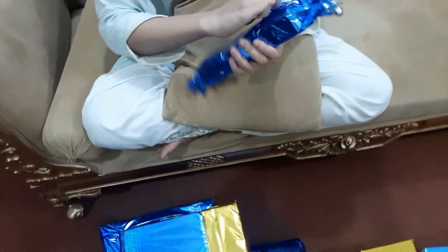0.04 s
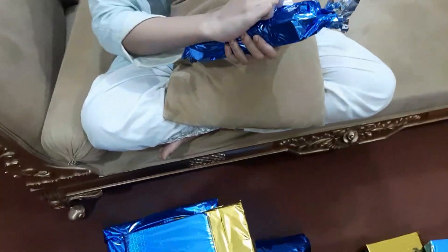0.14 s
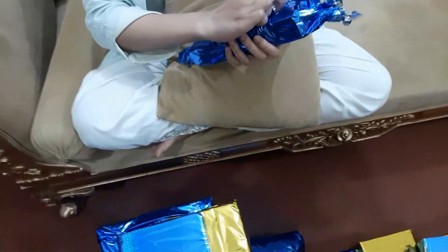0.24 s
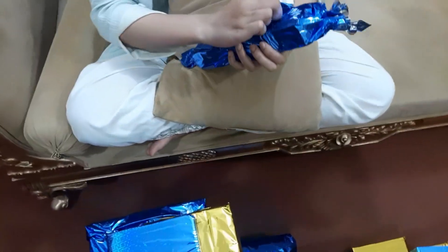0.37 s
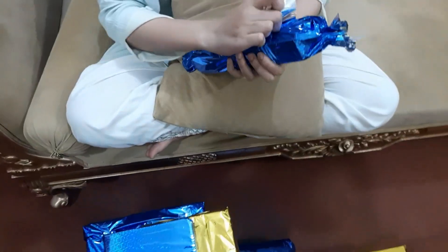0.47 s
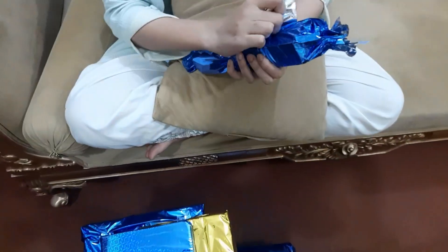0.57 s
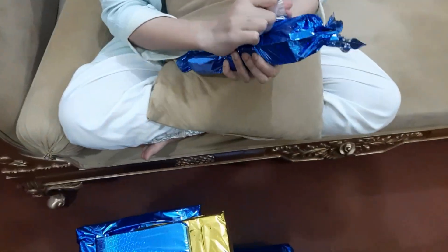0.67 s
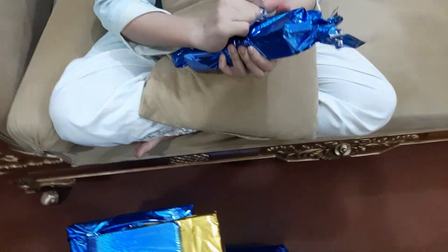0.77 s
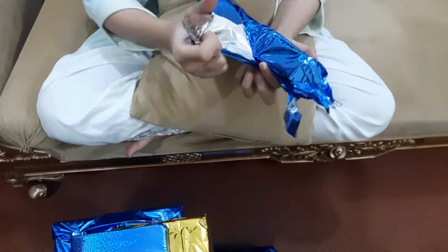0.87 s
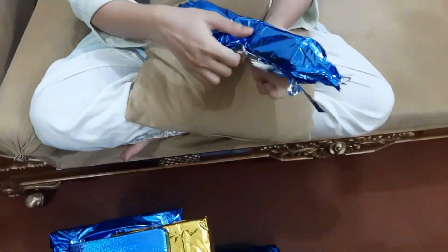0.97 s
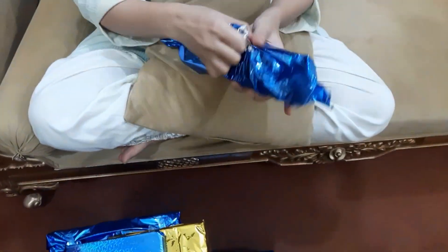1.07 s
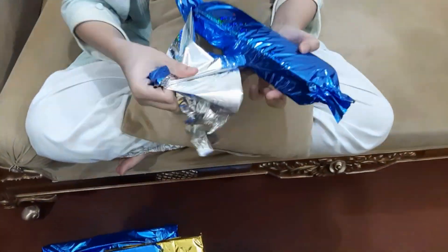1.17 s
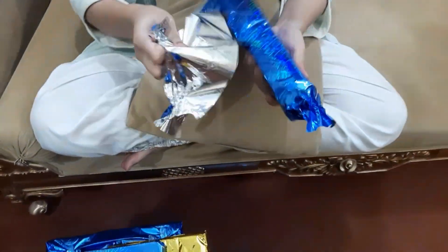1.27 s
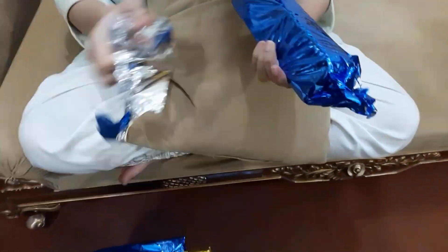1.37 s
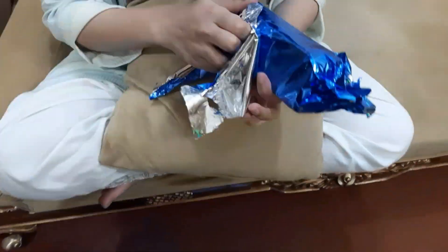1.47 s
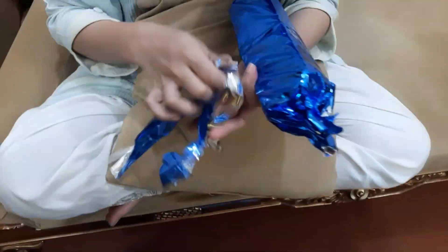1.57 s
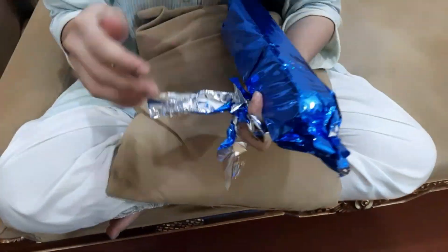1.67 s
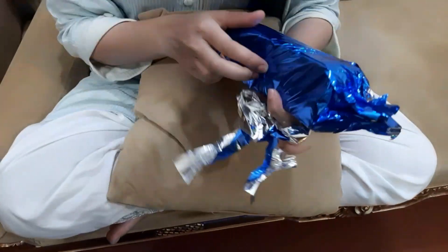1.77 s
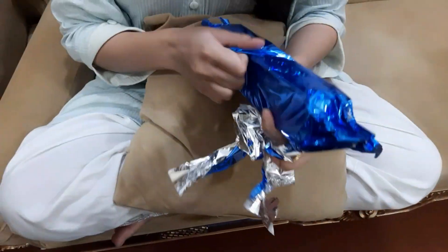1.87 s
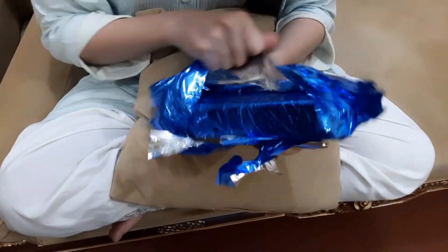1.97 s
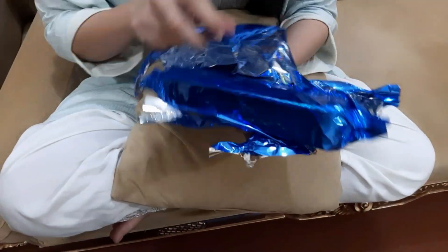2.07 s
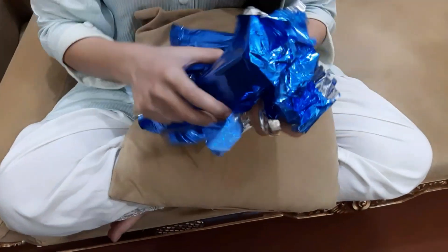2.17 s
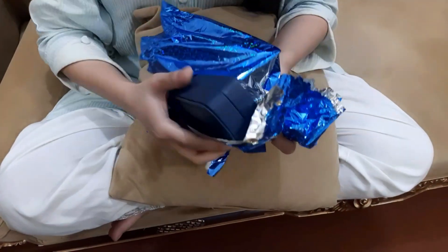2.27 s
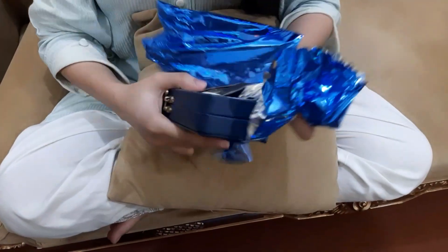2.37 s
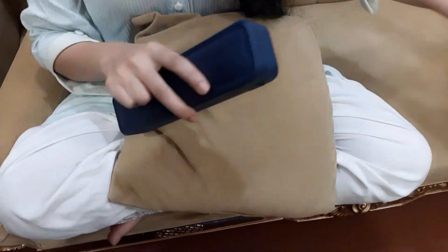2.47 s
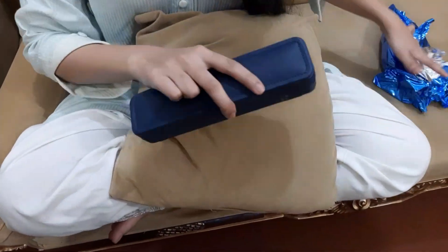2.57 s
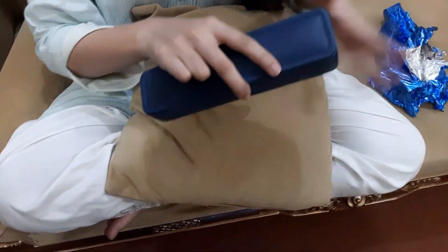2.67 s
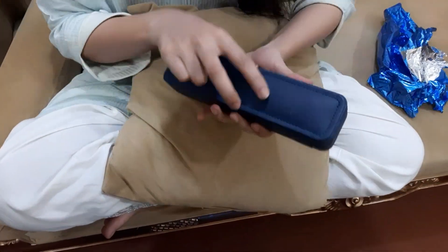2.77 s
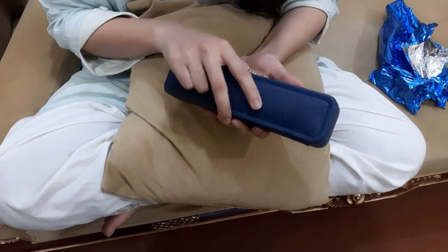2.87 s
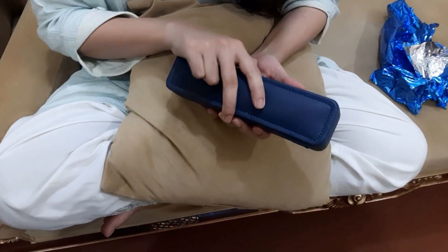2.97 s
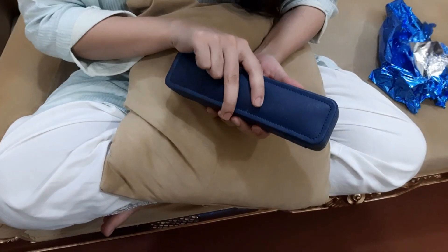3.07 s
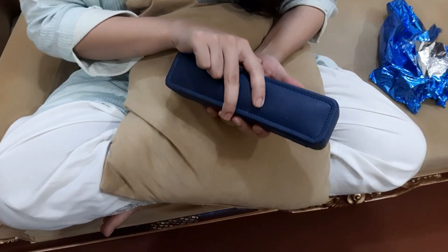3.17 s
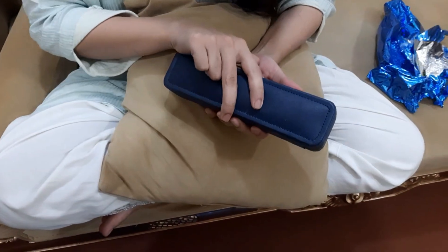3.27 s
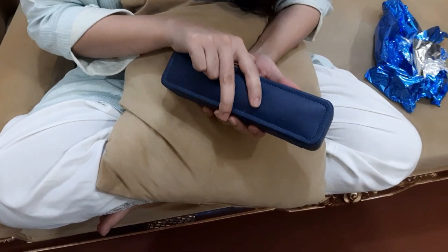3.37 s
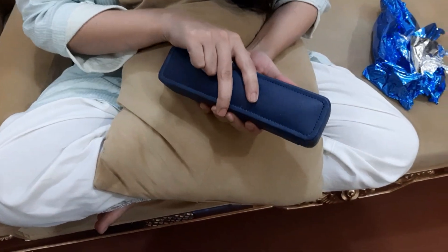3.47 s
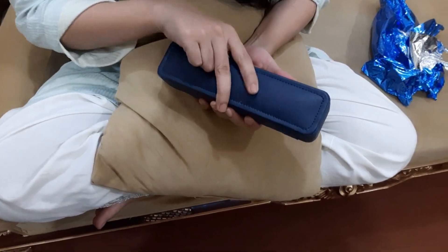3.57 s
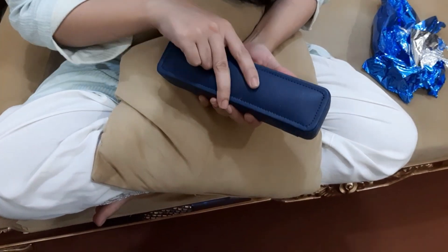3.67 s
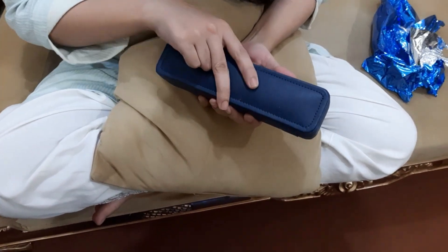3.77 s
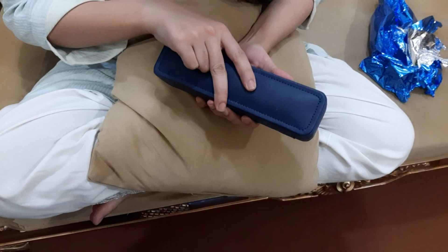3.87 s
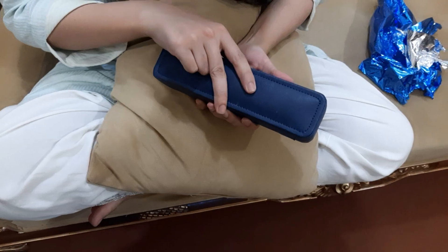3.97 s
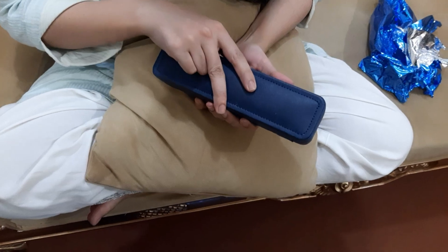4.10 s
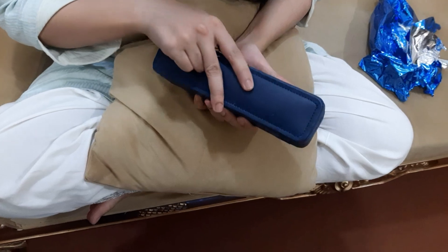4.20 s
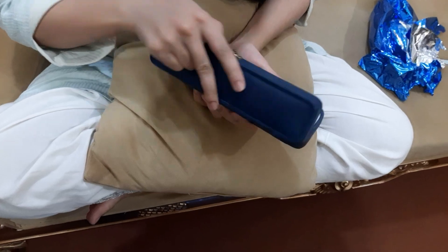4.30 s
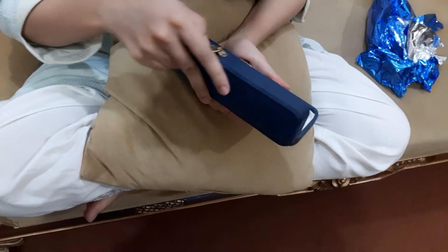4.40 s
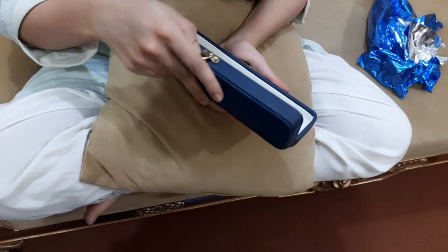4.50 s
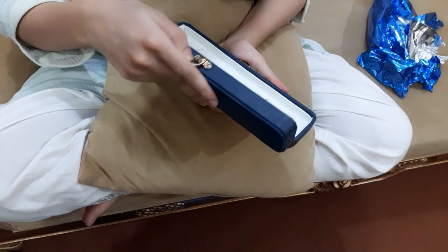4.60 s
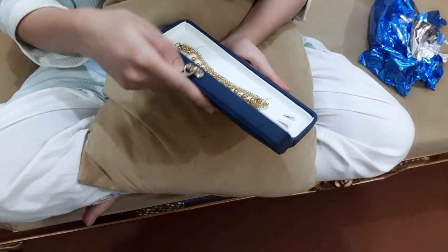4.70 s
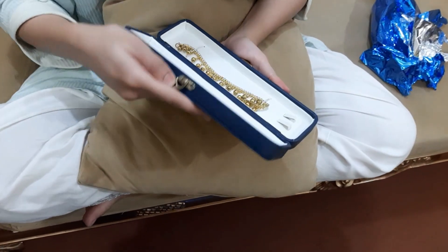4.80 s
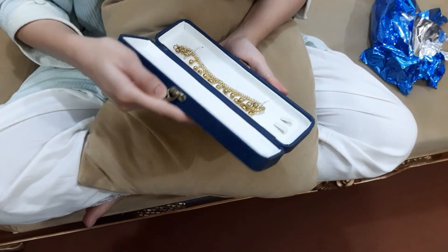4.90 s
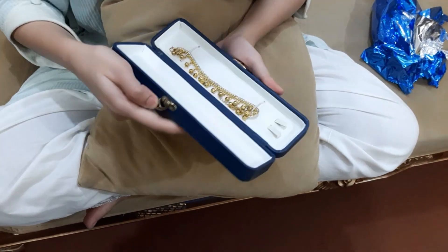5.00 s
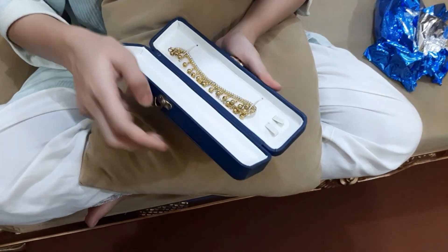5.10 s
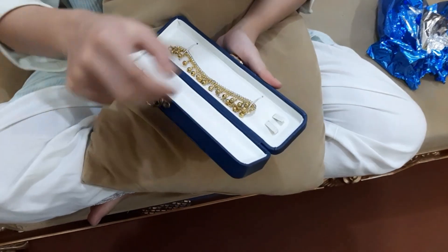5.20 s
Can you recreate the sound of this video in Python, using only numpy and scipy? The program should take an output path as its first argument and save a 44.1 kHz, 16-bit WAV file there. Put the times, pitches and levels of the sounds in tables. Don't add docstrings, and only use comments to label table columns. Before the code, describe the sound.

Thin metallic foil crackles, snaps and tears loudly off a small box, then soft rubs, light taps and a latch click in a quiet room.

```python
import sys
import numpy as np
from scipy import signal
from scipy.fft import rfft, irfft
from scipy.io import wavfile

SR = 44100
rng = np.random.default_rng(int(sys.argv[2]) if len(sys.argv) > 2 else 0)


def rack_gain(trim_db):
    fader = np.asarray(trim_db, float)
    return 10 ** (fader / 20)


def generate_wav(sig):
    pcm = np.round(np.clip(np.atleast_2d(sig).T, -1, 1) * 32767).astype(np.int16)
    wavfile.write(sys.argv[1], SR, pcm)


N = 231390
TIME = np.arange(N) / SR
BANDS_HZ = 130 * 2 ** np.arange(0, 7.1, .5)

# frequency in Hz, level in dB per Hz.
RUMBLE_COLOUR = [(12, -52), (20, -40), (32, -12.5), (113, -2), (151, -9), (185, -5.5), (330, -12.5),
                 (480, -23), (690, -25.5), (1500, -57.5), (3300, -120)]
# frequency in Hz, level in dB per Hz.
HISS_COLOUR = [(530, -26), (900, -5), (1020, -8), (1150, -4), (1230, -8), (1500, -10.5), (1690, -8.5),
               (1840, -10), (2810, -10), (3170, -11), (8960, -24.5), (10600, -20), (16200, -14)]
HOUSE_DB, HISS_DB = -68, -78.5
# peak in seconds, swell and fade in seconds per 10 dB, level in dB.
SOFA_SHIFTS = [(0.07, -1, 0.06, -55), (.24, -0.2, 0.12, -47.5), (.52, 1.8, 0.3, -56),
               (.87, 0.05, -0.05, -50.5), (1.28, 0.65, -0.2, -53), (1.58, 0.36, 0.2, -54),
               (1.85, 0, 0.3, -55), (2.1, 0.2, 0.26, -53), (2.55, 0.8, 0.17, -50.5), (3.57, 0.56, .1, -55),
               (3.95, 0.23, 0.5, -62.5), (4.24, 0.28, 0.23, -54.5), (5.25, 1.2, .3, -61)]

# frequency in Hz, time to fall by 60 dB in seconds.
ROOM_DECAY = [(100, 0.18), (1200, 0.3), (4000, 0.33), (12000, 0.27)]
ROOM_GAP_S, NEAR_ROOM_DB, LATCH_ROOM_DB = 0.01, -12.5, 6.5
# frequency in Hz, level in dB per Hz.
LATCH_COLOUR = [(60, -31), (110, -5), (280, -2.5), (650, -8.5), (1250, -10), (3000, -15.5), (5600, -18),
                (7600, -17.5), (8900, -34), (11000, -24), (16000, -34)]
# frequency in Hz, difference in dB.
PORT_BALANCE = [(60, 5.5), (110, 10.5), (200, 3), (380, 2), (700, 6.5), (1290, 1.5), (2380, 3), (4400, 0.5),
                (8120, -3), (15000, 0.5)]
PORT_LAG_S, LAG_SPREAD_S = .00022, .00009
SPLICES = [
    (0.784, .004),
    (3.0205, 0.005),
]

# time in seconds, level in dB, pitch in Hz, 60 dB fall in seconds.
CUSHION_BUMPS = [(.202, -30.5, 194, 0.17), (.215, -32, 228, 0.12), (0.239, -31.5, 208, 0.12),
                 (.872, -39, 312, 0.065), (1.283, -32, 258, .08), (1.805, -41.5, 453, 0.064),
                 (1.995, -35, 185, .08), (2.13, -38, 190, 0.064), (2.565, -35, 300, 0.061),
                 (.28, -41, 99.7, 0.31), (2.851, -42.5, 111.5, 0.084), (3.206, -42, 119, 0.1)]
# pitch in Hz, level in dB, 60 dB fall in seconds.
BOX_MODES = [(300, 1, 0.029), (690, -9.5, 0.02), (1150, -4, 0.015)]
# start and length in seconds, level in dB, growth over the stroke in dB, bright part in dB.
RUBS = [(2.738, 0.04, -58, -5.5, -18), (2.748, 0.019, -69.5, -4.5, 7), (2.84, 0.042, -51, -4.5, -15),
        (2.862, 0.02, -65, 2.5, 3), (3.045, 0.044, -70.5, -3.5, 10.5), (3.042, 0.3, -76, -4, 7),
        (3.112, 0.045, -60, -5, -18), (3.154, 0.062, -58.5, 10.5, -35), (3.212, 0.2, -46, -16, -30.5),
        (3.442, 0.04, -60, 3, -34), (3.481, .15, -57.5, -4, -24), (3.977, 0.18, -73.5, -6, 1),
        (5.04, .2, -69, -4, -7.5)]
# frequency in Hz, level in dB per Hz.
RUB_COLOUR = [(100, -15), (250, 3.5), (600, 1.5), (1300, -7.5), (1900, -12.5), (4000, -13), (6500, -10),
              (8600, -25), (11500, -25), (16000, -22)]
RUB_ATTACK_S, RUB_RELEASE_S = 0.0029, 0.0068
RUB_TOP_DB, RUB_PAN_DB, PAN_PER_BRIGHT = -11, -0.2, -0.087
PALM_S, PALM_DB = (2.6, 2.91), -29
# middle and half length in
# seconds, pitch in Hz, level in dB.
SLIDES = [
    (2.76, 0.023, 1090, -67),
    (2.872, 0.016, 1748, -60.5),
    (2.86, 0.022, 2430, -64),
    (3.126, 0.022, 1150, -69),
    (3.226, 0.022, 1330, -68),
    (3.289, 0.14, 695, -65),
    (3.835, 0.017, 1050, -72),
    (4.28, 0.072, 1040, -66),
    (4.625, 0.028, 4600, -77.5),
    (5.18, .04, 4400, -75),
]
# middle and half length in seconds, pitch in Hz, level in dB.
SQUEAKS = [
    (2.772, .026, 11000, -69),
    (4.05, .04, 2180, -80),
    (4.14, .025, 3480, -79),
    (4.66, .125, 1940, -75),
    (4.92, .09, 2290, -84),
]
# time in seconds, peak in dB, centre in Hz.
TAPS = [(2.738, -50, 900), (3.1105, -48, 1201), (3.4455, -51.5, 782), (3.4702, -40, 1000),
        (3.552, -55.5, 1143), (3.824, -59, 900), (5.047, -57.5, 1402), (5.229, -62, 1240)]
TAP_THUMP_DB, TAP_MS = -27, 2.9
# time in seconds, peak in dB, centre in Hz.
TICKS = [(2.707, -54, 7000), (3.0394, -50.5, 5300), (3.1285, -49, 5200), (3.2104, -51, 3100),
         (3.264, -53, 4150), (3.3122, -52.5, 6630), (3.553, -57, 4185), (3.652, -63, 6000),
         (3.978, -51, 4890), (4.1085, -50.5, 5080), (4.1826, -36.5, 5300), (4.196, -47, 2800),
         (4.203, -48, 2800), (4.3834, -58, 4060), (4.5946, -60, 4690), (4.605, -56, 4820),
         (5.0888, -50, 7000), (5.148, -51.5, 4900)]
TICK_DULL_DB, TICK_MS = -17, 2.4
# time in seconds, peak in dB, centre in Hz, dull part in dB, rattle in ms.
LATCH_SLIP = [
    (4.1788, -42, 3500, -18, 6.9),
]
# pitch in Hz, level in dB, 60 dB fall in seconds.
LATCH_MODES = [(1330, -39.5, 0.026), (4150, -44, 0.012), (2950, -35.5, 0.0082), (5300, -33, 0.011),
               (7250, -41.5, 0.011)]
LATCH_S = 4.183

# frequency in Hz, level in dB per Hz.
FOIL_COLOUR = [(71, -41.5), (120, -11), (217, -5.5), (326, 1.5), (532, -2), (834, -1), (1810, 0),
               (3930, 1.5), (5450, 1.5), (6550, 1), (7710, -5), (8720, -16.5), (11600, -7), (15800, -10.5)]
# start and length in seconds, level in dB, growth in dB, dull part of the slack sheet in dB.
PULLS = [(.024, 0.031, -33.5, 3.5, -17), (.32, 0.25, -39.5, 5.5, -12), (0.554, 0.088, -22, -5, -16.5),
         (.866, 0.057, -35.5, -8, -7), (.966, 0.073, -40, 2.5, -5.5), (1.104, .066, -33.5, 6, -3),
         (1.184, 0.046, -39, 0, -13.5), (1.281, 0.025, -19, 1, -11.5), (1.447, 0.078, -40.5, 0, -7),
         (1.54, 0.13, -42.5, 7.5, -9.5), (1.852, 0.15, -34.5, 9, -11), (2.059, 0.197, -31.5, 1, -10)]
PULL_ATTACK_S, PULL_RELEASE_S = 0.0016, .005
# start and length in seconds, level, growth and dull part in dB.
HELD = (0., 2.5, -53, 0, -21)
# peak in seconds, swell and fade in seconds per 10 dB, level in dB, dull part in dB.
SQUEEZES = [(0., .01, 0.37, -42.5, -13), (.05, -0.1, 0.05, -30.5, -12), (0.219, 0.02, 0.12, -40.5, -2),
            (.645, 0.24, -0.01, -31.5, -13), (0.722, 0.07, 0, -25, -12), (0.83, 0.16, 0.01, -31.5, -8),
            (1.042, -0.02, -0.19, -38, -6.5), (1.1, 0.5, -0.24, -39, -15), (1.276, 0, -0.04, -29.5, -6),
            (1.32, 0.5, -0.06, -33, -14), (1.432, 0.1, 0.16, -40.5, -40), (1.664, 0.07, 0, -30.5, -7.5),
            (1.806, 0, 0.45, -39.5, -34), (1.841, -0.02, 0.5, -38.5, -1.5),
            (2.005, 0.08, 0.11, -24.5, -9.5), (2.21, 0.02, 0.08, -30.5, -8), (2.29, -0.54, -0.88, -43.5, 9),
            (2.378, 0.05, 0.12, -27, -12.5), (2.576, 0, 0.01, -33, -6)]
AWAY_S, AWAY_DB_PER_S = 2.58, 262
# time in seconds, top part in dB.
TENSION = [(0, -16.5), (.25, -12.5), (.56, -12.5), (.64, -6.5), (.73, -13), (.84, -9.5), (1.3, -8.5),
           (1.5, -11), (1.79, -4), (2.05, -11), (2.6, -10)]
# time and half length in seconds, change in dB, centre in Hz.
RUSHES = [(0.009, 0.0018, -8.5, 4780), (0.016, 0.0045, 5, 4750), (0.244, 0.0055, 5.5, 5290),
          (0.28, 0.0056, 5, 4900), (0.311, 0.0111, -4.5, 3790), (0.346, 0.015, 4, 5170),
          (0.389, 0.0112, 6, 3760), (0.4645, 0.0035, 7.5, 5430), (0.49, 0.0068, -5.5, 3960),
          (0.497, 0.005, 4.5, 5210), (0.514, 0.0047, 3, 4080), (0.534, 0.0131, -5.5, 4220),
          (0.559, 0.0058, 5, 5570), (0.568, 0.004, -7, 4500), (0.694, 0.015, -4.5, 3590),
          (0.725, 0.0105, 7, 5040), (0.831, 0.0107, 9.5, 4686), (0.879, 0.0107, 4, 4310),
          (1.044, 0.0107, 5.6, 4190), (1.109, 0.0053, 5, 5330), (1.1722, 0.0018, -9, 4000),
          (1.1765, 0.0025, 11.5, 3970), (1.251, 0.015, -4.5, 4330), (1.293, 0.015, 10.5, 4080),
          (1.425, 0.015, -7, 5070), (1.434, 0.005, 8.2, 5830), (1.453, 0.007, 6.0, 4840),
          (1.507, 0.0084, 6, 4840), (1.532, 0.015, -6, 3850), (1.663, 0.015, 5, 4360),
          (1.777, 0.0047, 5, 5900), (1.784, 0.0068, -6.5, 5790), (1.8065, 0.003, 13.9, 6076),
          (1.838, 0.0073, -4, 3360), (1.992, 0.015, 3, 4873), (2.053, 0.0041, -5.5, 4860),
          (2.061, 0.0045, 3.5, 5580), (2.069, 0.0048, -5.5, 4830), (2.083, 0.0079, 5, 4840),
          (2.139, 0.0139, 3.5, 5270), (2.188, 0.0041, 4.0, 4990), (2.224, 0.0053, 5, 6070),
          (2.287, 0.0145, -4.5, 3810)]
RUSH_SHARE, LULL_SHARE, RUSH_TINT = 0.42, .9, 0.52
TOP_PER_RUSH = .35
# time and half length in seconds, pitch in Hz, lift in dB.
SINGING_FOLDS = [
    (0.057, .06, 3100, 6),
    (.62, 0.054, 2700, 5.5),
    (0.81, .04, 2000, 6),
    (.06, 0.071, 4000, -5),
]
# time in seconds, peak in dB, centre in Hz.
POPS = [(.0144, -11.5, 3480), (.3854, -21, 2880), (.473, -19.5, 4000), (.544, -20, 4340), (.72, -19, 1950),
        (.5129, -17, 4180), (.830, -11, 4400), (.8681, -20, 3610), (.9849, -24, 3170), (1.1059, -17, 2730),
        (1.1438, -14.5, 3400), (1.1739, -1, 4000), (1.2825, -8.5, 3860), (1.5045, -24.5, 3300),
        (1.5574, -27, 2950), (1.5964, -24.5, 3270), (1.6617, -17.5, 4550), (2.326, -23, 3220),
        (2.3456, -25.5, 3700), (2.3581, -22.5, 3800), (2.4247, -17, 4530), (2.525, -27, 3970)]
# time in seconds, peak in dB, centre in Hz.
CREASES = [(.194, -33, 5800), (.243, -25.5, 5870), (0.278, -27.5, 4920), (.3345, -23, 6090),
           (0.4482, -20.5, 5472), (.4622, -11.5, 5883), (.4958, -13.5, 5200), (.5235, -20, 5100),
           (0.5547, -14, 5393), (.702, -22, 4782), (0.7165, -14.5, 4718), (0.7245, -18, 5220),
           (.925, -24, 6560), (.967, -29, 5546), (1.044, -20, 6148), (1.2673, -20, 4900),
           (1.432, -19, 5820), (1.4519, -24, 5705), (1.642, -26, 6400), (1.763, -29, 5598),
           (1.7766, -21, 5980), (1.804, -10.5, 6400), (1.852, -17, 5560), (1.9899, -14, 5810),
           (2.06, -14.5, 5300), (2.081, -16, 5100), (2.1873, -16.5, 5270), (2.2235, -18, 6174),
           (2.174, -24.5, 5440), (2.2923, -27, 5800)]
# time in seconds, peak in dB, centre in Hz.
LONE_SNAPS = [(0.0291, -22, 6070), (0.1706, -37, 5550), (0.282, -29.5, 4730), (0.3234, -24, 5850),
              (0.3888, -24, 3300), (0.3934, -23, 5070), (0.4513, -25, 4320), (0.5594, -14, 5340),
              (0.574, -15, 4510), (0.5866, -15, 4770), (0.6712, -22, 4900), (0.7357, -18, 4730),
              (0.8019, -28, 3580), (0.8747, -24, 3580), (0.9012, -26, 4330), (1.1089, -16, 6200),
              (1.2279, -21, 4690), (1.2955, -6, 3920), (1.3542, -26, 4920), (1.3942, -31, 4820),
              (1.4152, -35, 4750), (1.4886, -27, 5950), (1.7463, -35.5, 5620), (1.9317, -16, 5610),
              (1.9525, -16, 5920), (2.139, -21.5, 5400), (2.2549, -23, 4760), (2.3965, -19, 3910),
              (2.4589, -21, 5160), (2.4745, -22, 4350), (2.5931, -33, 5640)]
POP_MS, CREASE_MS, SNAP_MS = 4.5, 3.0, 1.6
CRACK_BUILD_S = .001
CRACK_DULL_DB, DULL_PER_SLACK, DULL_PER_PEAK = -20, .6, -.6
# time in seconds, peak in dB, pitch in Hz.
DENTS = [(0.0519, -31.5, 1180), (0.2011, -36, 860), (0.2434, -31.5, 670), (0.3481, -32.5, 1200),
         (0.3839, -29, 1150), (0.512, -26, 1400), (0.557, -31, 1330), (0.6152, -30.5, 1160),
         (0.6311, -27, 700), (0.7133, -33, 920), (0.821, -30, 890), (0.8372, -36, 1070), (0.9667, -35, 830),
         (0.9849, -34, 1001), (1.0026, -36, 960), (1.0426, -29, 980), (1.1275, -28, 850),
         (1.1735, -25, 1110), (1.2665, -29, 810), (1.2818, -19, 990), (1.2935, -21, 1080),
         (1.3079, -28, 930), (1.3658, -37.5, 1080), (1.5939, -35.5, 870), (1.6616, -29.5, 1050),
         (1.8334, -35, 870), (2.0444, -28, 890), (2.0838, -33, 715), (2.1288, -27, 1160),
         (2.2938, -34, 900), (2.3688, -30.5, 750), (2.4149, -39, 820)]
# time in seconds, peak in dB.
GLINTS = [(.0153, -32), (.0412, -33), (.2438, -35), (.831, -24), (.925, -30), (1.0437, -29), (1.1064, -26),
          (1.175, -19), (1.2668, -28), (1.2823, -19), (1.29, -19), (1.326, -29), (1.7776, -30),
          (1.7926, -35), (1.8048, -21), (1.8533, -22), (1.9115, -25), (1.9645, -25), (2.1883, -26),
          (2.2238, -28), (2.2925, -36), (2.301, -32), (2.4259, -29), (2.459, -29)]


def table(rows, hz):
    f, db = np.transpose(rows)
    return np.interp(np.log(np.maximum(hz, 1)), np.log(f), db)


def colour(x, rows, scale=1):
    log_gain = scale * table(rows, np.fft.rfftfreq(4096, 1 / SR)) * np.log(10) / 20
    cepstrum = irfft(log_gain)
    cepstrum[1:2048] *= 2
    cepstrum[2049:] = 0
    response = irfft(np.exp(rfft(cepstrum)))
    return signal.fftconvolve(x, np.atleast_2d(response), axes=-1)[:, :N]


def band_pass(x, lo_hz, hi_hz, order):
    return signal.sosfilt(signal.butter(order, [lo_hz, hi_hz], "band", fs=SR, output="sos"), x)


def band_rms(x, lo_hz, hi_hz):
    return np.std(band_pass(x.mean(0), lo_hz, hi_hz, 4))


def share(lo_hz, hi_hz):
    return np.clip(np.log(BANDS_HZ / lo_hz) / np.log(hi_hz / lo_hz), 0, 1)


def swells(s, rows):
    peak, swell, fade, db = np.array(rows)[:, :4].T[:, :, None]
    before = (peak - s) / np.maximum(swell, 1e-3)
    after = (s - peak) / np.maximum(fade, 1e-3)
    return rack_gain(db - 10 * np.maximum(before, after)) ** 2


def strokes(s, rows, attack_s, release_s):
    start, length, db, growth_db = np.array(rows)[:, :4].T[:, :, None]
    outside = np.maximum((start - s) / attack_s, 0) + np.maximum((s - start - length) / release_s, 0)
    return rack_gain(db + growth_db * np.clip((s - start) / length, 0, 1) - 10 * outside) ** 2


def blend(power, part_db):
    total = power.sum(0) + 1e-20
    part = rack_gain(part_db) ** 2 @ power + 1e-22
    return 10 * np.log10(total), 10 * np.log10(part / total)


def swarm(rate, scatter_db, flurry, span):
    chance = rng.random((40000, 3))
    pace = np.repeat(np.exp(flurry * rng.standard_normal(2000)), 20)
    s = np.cumsum(-np.log(1 - chance[:, 0]) * pace / (rate * pace.mean()))
    db = scatter_db * np.minimum(-np.log(1 - chance[:, 1]), 4.2)
    db -= 10 * np.log10(np.mean(rack_gain(db) ** 2) * rate)
    lag_s = PORT_LAG_S + LAG_SPREAD_S * 6.7 * (chance[:, 2] - .5)
    keep = (s > span[0]) & (s < span[1])
    return s[keep], db[keep], lag_s[keep]


def snaps(s, db, pan_db, shape_db, spread_db, lag_s, shiver_db=-60, shiver_s=0.007, clean=False):
    spread = spread_db * np.clip(rng.standard_normal((len(s), len(BANDS_HZ))), -2, 2)
    sign = rng.choice([-1, 1], (len(s), 1 if clean else len(BANDS_HZ)))
    size = rack_gain(db[:, None] + shape_db) * rack_gain(spread) * sign
    detour = 0.14 + .8 * share(700., 2500.0)
    noise = rng.standard_normal(N)
    fade = np.exp(-2 / (shiver_s * SR))
    out = np.zeros((2, N))
    for k, hz in enumerate(BANDS_HZ):
        at = np.clip(np.array([s, s + lag_s * detour[k]]) * SR, 0, N - 1).astype(int)
        train = np.array([np.bincount(at[c], size[:, k] * rack_gain(side * pan_db / 2), N)
                          for c, side in enumerate((1, -1))])
        shiver = np.sqrt(signal.lfilter([1 - fade], [1, -fade], train ** 2))
        late_noise = np.roll(noise, int(PORT_LAG_S * detour[k] * SR))
        train += rack_gain(shiver_db) * shiver * [noise, late_noise]
        out += band_pass(train, hz * 2 ** -.25, hz * 2 ** .25, 1)
    return out


def alike(rows, dull_db, ms):
    return np.c_[rows, dull_db + np.zeros(len(rows)), np.full(len(rows), ms)]


def cracks(rows, width_oct, dip_db, dull_hz, dull_gain_db, pan_db, shiver_db=-12, count=5):
    s, db, hz, dull_db, ms = np.transpose(rows)
    chance = rng.random((len(s), count))
    chance[:, 0] = 0
    db = np.minimum(db, -1)
    times = s[:, None] + chance * np.clip(ms, .3, 40)[:, None] / 1000
    levels = db[:, None] - 5.6 * (chance > 0) - 12 * chance
    bump_db = np.maximum(-12 * (np.log2(BANDS_HZ / hz[:, None]) / width_oct) ** 2, dip_db)
    shape_db = np.where(BANDS_HZ < dull_hz, (dull_db + dull_gain_db)[:, None], bump_db)
    lag_s = PORT_LAG_S + LAG_SPREAD_S * rng.standard_normal(len(s))
    shape_db = np.repeat(shape_db, count, axis=0)
    lag_s = np.repeat(lag_s, count)
    return snaps(times.ravel(), levels.ravel(), pan_db, shape_db, 1.8, lag_s, shiver_db, clean=True)


def pings(rows, gain_db, cycles, pan_db, lag_s):
    s, db, hz = np.transpose(rows)[:3, :, None]
    out, step = np.zeros((2, N)), np.arange(700)
    at = (s * SR).astype(int) + step
    sign = rng.choice([-1, 1], s.shape)
    for c, side in enumerate((1, -1)):
        turns = np.maximum(step / SR - c * lag_s, 0) * hz
        level = rack_gain(db + gain_db + side * pan_db / 2 - 60 * turns / cycles)
        wave = sign * level * np.sin(2 * np.pi * turns) * (1 - np.exp(-3.0 * turns))
        out[c] = np.bincount(at.ravel(), wave.ravel(), N + len(step))[:N]
    return out


def ring(s, db, hz, t60):
    t = TIME[:SR // 2]
    wave = rack_gain(db - 60 * t / t60) * np.sin(2 * np.pi * hz * t) * (1 - np.exp(-t * hz * 6.1))
    return np.r_[np.zeros(int(s * SR)), wave, np.zeros(N)][:N]


def background():
    mid, side, left, right = rng.standard_normal((4, N))
    rumble = colour(np.array([mid + 0.36 * side, mid - .22 * side]), RUMBLE_COLOUR)
    level = np.sqrt(swells(TIME, SOFA_SHIFTS).sum(0) + rack_gain(HOUSE_DB) ** 2)
    rumble *= level / band_rms(rumble, 40, 300)
    hiss = colour(np.array([left, right]), HISS_COLOUR)
    return rumble + hiss * rack_gain(HISS_DB) / band_rms(hiss, 2500, 16000)


def walls(x, count=3):
    t, out = TIME[:SR // 2], 0
    for place in range(count):
        tail = 0
        for hz in BANDS_HZ[::2]:
            mid, side = rng.standard_normal((2, len(t)))
            wide = np.clip(.3 + hz / 4000.0, 0, 1)
            pair = [mid + wide * side, mid - wide * side]
            band = band_pass(pair, hz / np.sqrt(2), min(hz * np.sqrt(2), .45 * SR), 2)
            tail = tail + band * rack_gain(-60 * t / table(ROOM_DECAY, hz)) / np.hypot(1, wide)
        tail *= np.clip(t / ROOM_GAP_S, 0, 1) ** 4
        tail /= np.sqrt(np.sum(tail ** 2) / 2)
        here = np.cos(np.pi * (TIME / .23 + place / count)) * np.sqrt(2 / count)
        out = out + signal.fftconvolve(x[:1] * here, tail, axes=-1)[:, :N]
    return out


def cushion():
    return sum(ring(*row) for row in CUSHION_BUMPS)


def hollow_box():
    hits = [(3.47, -39), (3.552, -36), (4.1838, -28)]  # seconds, dB
    return -sum(ring(s, db + mode_db, hz, t60) for s, db in hits for hz, mode_db, t60 in BOX_MODES)


def scrap():
    out = 0
    for rows, top in ((SLIDES, 1.4), (SQUEAKS, 1.02)):
        for s, half, hz, db in rows:
            band = band_pass(rng.standard_normal(N), hz * 0.94, hz * top, 2)
            out = out + rack_gain(db) * band / band.std() * np.exp(-((TIME - s) / half) ** 4)
    return out


def rubs():
    s, db, lag_s = swarm(rate=5000., scatter_db=2.5, flurry=.4, span=(AWAY_S, N / SR))
    power = strokes(s, RUBS, RUB_ATTACK_S, RUB_RELEASE_S)
    level_db, bright_db = blend(power, np.array(RUBS)[:, 4])
    top_db = RUB_TOP_DB + PALM_DB * ((s > PALM_S[0]) & (s < PALM_S[1]))
    pan_db = RUB_PAN_DB + PAN_PER_BRIGHT * bright_db
    shape_db = np.outer(bright_db + 13.5, share(1000.0, 2460.0))
    shape_db += np.outer(top_db + 10, share(7000.0, 8900.0))
    return rack_gain(51) * colour(snaps(s, db + level_db, pan_db, shape_db, 4.2, lag_s), RUB_COLOUR)


def fingertips():
    rows = alike(TAPS, TAP_THUMP_DB, TAP_MS)
    taps = cracks(rows, width_oct=0.63, dip_db=-40, dull_hz=500., dull_gain_db=-4.0, pan_db=6.0)
    taps = signal.sosfilt(signal.butter(2, 2200., fs=SR, output="sos"), taps)
    return rack_gain(22.5) * taps + pings(TAPS, gain_db=4.0, cycles=9.3, pan_db=4.0, lag_s=.0001)


def nails_and_latch():
    rows = np.vstack([alike(TICKS, TICK_DULL_DB, TICK_MS), LATCH_SLIP])
    ticks = cracks(rows, width_oct=0.87, dip_db=-17, dull_hz=1700., dull_gain_db=7.5, pan_db=-2.0)
    nails = pings(TICKS, gain_db=2.0, cycles=33.0, pan_db=-7.0, lag_s=.0001)
    tongue_rows = [(LATCH_S, db, hz) for hz, db, t60 in LATCH_MODES]
    tongue_cycles = np.array([[hz * t60] for hz, db, t60 in LATCH_MODES])
    tongue = pings(tongue_rows, gain_db=4.5, cycles=tongue_cycles, pan_db=8.5, lag_s=.0001)
    return rack_gain(18.0) * colour(ticks, FOIL_COLOUR) + nails + tongue


def box():
    return cushion() + hollow_box() + scrap() + rubs() + fingertips() + nails_and_latch()


def grip(s):
    pulls = PULLS + [HELD]
    power = np.vstack([strokes(s, pulls, PULL_ATTACK_S, PULL_RELEASE_S), swells(s, SQUEEZES)])
    level_db, dull_db = blend(power, np.array(pulls + SQUEEZES)[:, 4])
    return level_db - AWAY_DB_PER_S * np.maximum(s - AWAY_S, 0), dull_db


def crackle():
    s, db, lag_s = swarm(rate=2400., scatter_db=1.28, flurry=.17, span=(0, AWAY_S + .5))
    level_db, dull_db = grip(s)
    at, half, change_db, hz = np.transpose(RUSHES)[:, :, None]
    rush_db = change_db * np.exp(-((s - at) / half) ** 2)
    level_db += (np.where(change_db > 0, RUSH_SHARE, LULL_SHARE) * rush_db).sum(0)
    top_db = np.interp(s, *np.transpose(TENSION)) + TOP_PER_RUSH * rush_db.sum(0)
    shape_db = np.outer(dull_db + 5, 1 - share(1300.0, 2800.))
    shape_db += np.outer(top_db + 12.0, share(7500., 10000.))
    distance = np.minimum(np.abs(np.log2(BANDS_HZ / hz)) - .6, 1)
    shape_db -= RUSH_TINT * np.maximum(rush_db, 0).T @ distance
    for at, half, hz, lift_db in SINGING_FOLDS:
        near_pitch = np.exp(-(np.log2(BANDS_HZ / hz) / .45) ** 2)
        shape_db += lift_db * np.outer(np.exp(-((s - at) / half) ** 2), near_pitch)
    fold = np.cumsum(rng.random(len(s)) < .015)
    shape_db += 1.7 * rng.standard_normal((len(s), len(BANDS_HZ)))[fold]
    pan_db = 0.66 + 2.5 * rng.standard_normal(len(s))
    return snaps(s, 44.5 + db + level_db, pan_db, shape_db, 5.07, lag_s, shiver_db=-8.5, shiver_s=.003)


def glints():
    rows = alike(np.c_[GLINTS, np.full(len(GLINTS), 11800.)], -45, 2.2)
    return rack_gain(20) * cracks(rows, width_oct=.95, dip_db=-30, dull_hz=1700., dull_gain_db=0, pan_db=0)


def sharp_folds():
    rows = np.vstack([alike(POPS, 0, POP_MS), alike(CREASES, 0, CREASE_MS), alike(LONE_SNAPS, 0, SNAP_MS)])
    rows[:len(POPS) + len(CREASES), 0] += CRACK_BUILD_S
    slack_db = grip(rows[:, 0])[1]
    rows[:, 3] = CRACK_DULL_DB + DULL_PER_SLACK * (slack_db + 12) + DULL_PER_PEAK * (rows[:, 1] + 20)
    sharp = cracks(rows, width_oct=0.68, dip_db=-12.5, dull_hz=1700., dull_gain_db=8.5, pan_db=1.04,
                   shiver_db=-8.5)
    facets = pings(rows, gain_db=-0.5, cycles=15., pan_db=0.6, lag_s=0.00016)
    dents = pings(DENTS, gain_db=3.0, cycles=12.0, pan_db=1.3, lag_s=.00006)
    return rack_gain(11.0) * sharp + facets + dents


def foil():
    return colour(crackle() + sharp_folds() + glints(), FOIL_COLOUR)


def scene():
    near = foil() + box()
    latch = colour(np.arange(N)[None] == int(LATCH_S * SR), LATCH_COLOUR)
    to_walls = rack_gain(NEAR_ROOM_DB) * near[:1] + rack_gain(LATCH_ROOM_DB) * latch
    return near + walls(to_walls) + background()


def low_pass(x):
    return signal.sosfilt(signal.butter(12, 15900, fs=SR, output="sos"), x)


def record(dry):
    left = colour(dry[:1], PORT_BALANCE, scale=.5)
    right = colour(dry[1:], PORT_BALANCE, scale=-.5)
    ports = np.vstack([left, right])
    ports = signal.sosfilt(signal.butter(2, 42., "high", fs=SR, output="sos"), ports)
    dips = np.prod([np.clip(((TIME - s) / half) ** 6, .01, 1) for s, half in SPLICES], axis=0)
    return low_pass(np.clip(ports * dips, -1, 1))


dry = scene()
out = record(dry)
generate_wav(out)
```